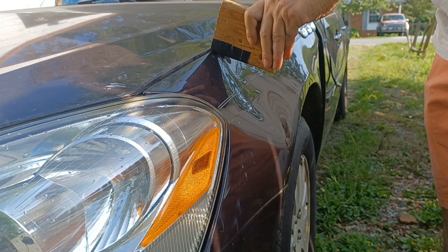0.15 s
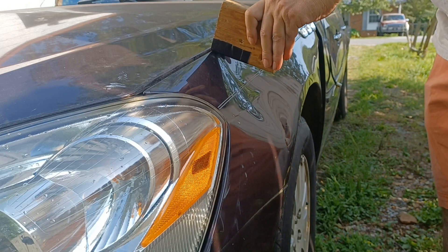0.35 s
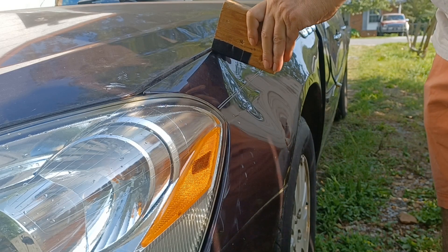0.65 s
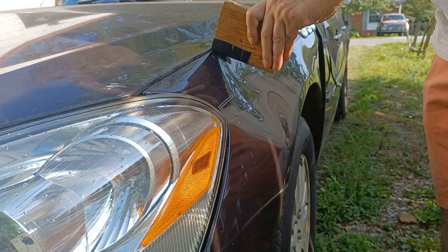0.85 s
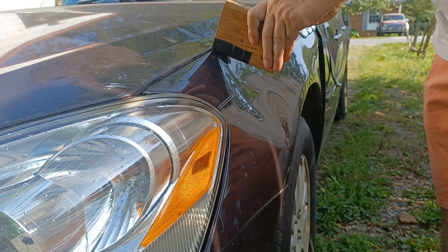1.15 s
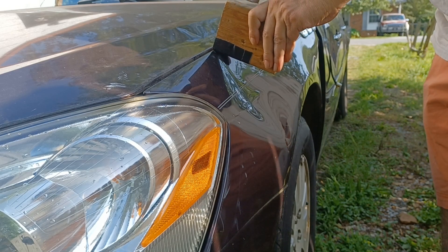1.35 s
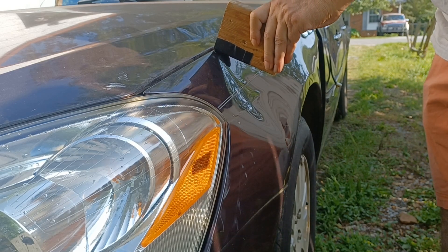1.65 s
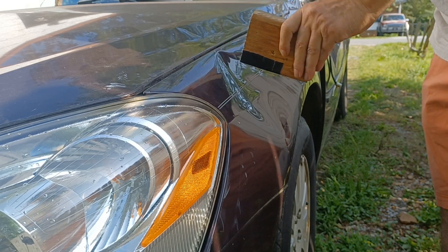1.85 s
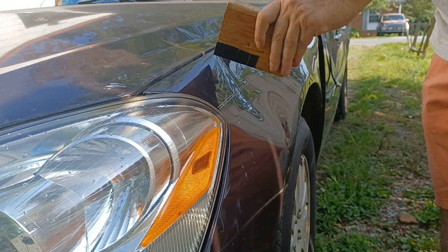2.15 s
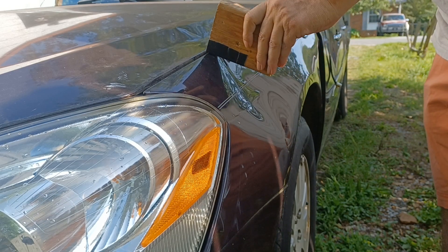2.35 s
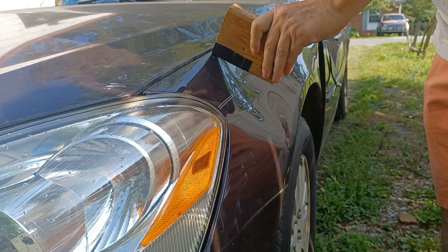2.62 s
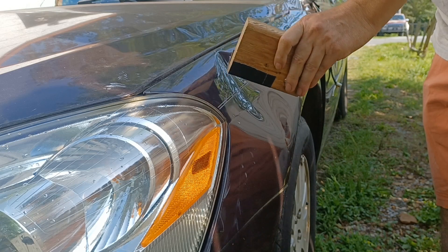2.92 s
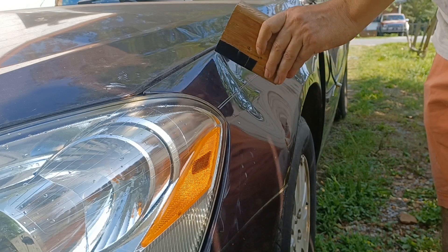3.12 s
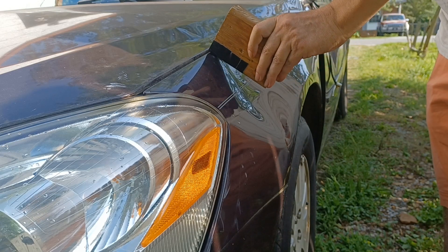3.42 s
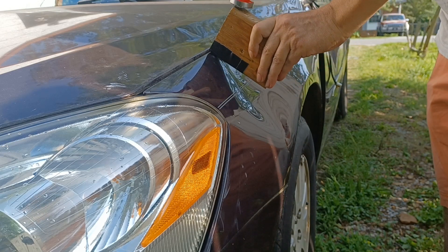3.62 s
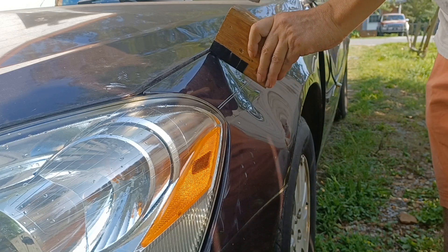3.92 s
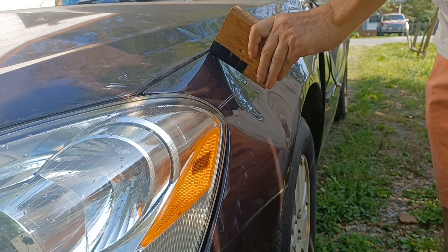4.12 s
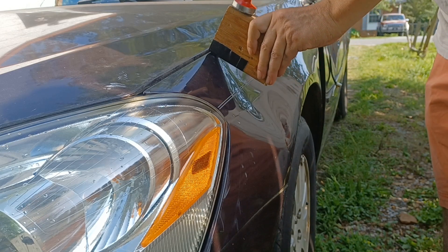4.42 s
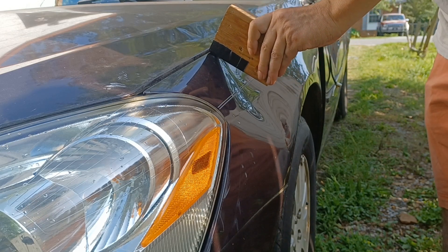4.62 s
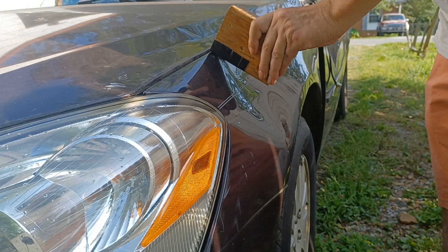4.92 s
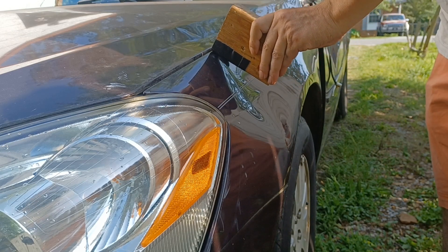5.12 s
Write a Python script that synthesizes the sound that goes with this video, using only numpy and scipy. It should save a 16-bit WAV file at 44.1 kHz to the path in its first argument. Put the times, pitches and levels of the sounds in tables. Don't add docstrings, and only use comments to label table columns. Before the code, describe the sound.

Close, loud knocks of steel on wood, each with a sharp crack, hollow panel thump and short tinny shimmer. A run of seven at under four per second, a quieter gap with three light taps, then a second run of six that sharpens as it goes. Open yard, faint insects, traffic and machine hum; the stereo microphone's left side turns thin late on.

```python
import sys
import numpy as np
from scipy import signal
from scipy.fft import rfft, irfft, next_fast_len
from scipy.io import wavfile
from scipy.ndimage import uniform_filter1d

SR = 44100
rng = np.random.default_rng(int(sys.argv[2]) if len(sys.argv) > 2 else 0)


def store_pcm(level_fs):
    pcm = np.round(np.clip(level_fs, -1, 1) * 32767).astype(np.int16)
    wavfile.write(sys.argv[1], SR, np.atleast_2d(pcm).T)


def amplitude_ratio(level_db):
    exponent = np.asarray(level_db, float) / 20
    return 10 ** exponent


N = 232126

# (time [s], level [dB], contact corner [Hz], crack [dB])
BLOWS = [(0.0526, -0.5, 7000, 1), (0.3643, -1, 5930, 0), (0.6394, -0.5, 7000, 0.5), (0.9261, 0, 7000, 1),
         (1.1955, -0.5, 7000, 1), (1.474, -0.5, 7000, 0.5), (1.7323, 0, 8000, -0.5), (2.5239, -26, 800, -9),
         (3.4137, -17, 615, -12.5), (3.512, -36.5, 493, -20), (3.7188, -4.5, 454, -11),
         (4.0277, -0.5, 1200, -2), (4.306, -1.5, 2040, 0), (4.5761, -0.5, 6000, -1), (4.8414, 0, 7000, -1),
         (5.1035, 0.5, 7000, -1.5)]
BLOCK_MOVES_S = 3.0
RING_N = int(0.4 * SR)
WOOD_SPLIT_HZ = 2600.0
HARD_HZ, FACE_RISE_CYCLES, PRESS_CYCLES = 7000, 4, 0.8
TICK_DB, TICK_S = 5.5, 0.0011


def hammer():
    t = np.arange(RING_N) / SR
    out = np.zeros((2, N + RING_N))
    steel = rng.standard_normal((2, RING_N))
    wood = signal.butter(4, WOOD_SPLIT_HZ, fs=SR, output="sos")
    bright = signal.butter(4, WOOD_SPLIT_HZ, "high", fs=SR, output="sos")
    upper = signal.butter(2, [1400.0, WOOD_SPLIT_HZ], "band", fs=SR, output="sos")
    arrival = np.clip(t / 0.0003 - 2.5, 0, 1)
    tick = amplitude_ratio(TICK_DB) * np.exp(-t / TICK_S)
    head = hammer_head(t)
    for time_s, level_db, contact_hz, crack_db in BLOWS:
        spot = float(time_s > BLOCK_MOVES_S)
        vary = rng.standard_normal((2, len(MODES), 1))
        fresh = rng.standard_normal((2, RING_N))
        dense = shimmer(0.75 * steel + 0.51 * fresh, t,
                        hold_s=0.017, late_db=-26, late_stretch=4.15, rise_s=0.0011)
        body = amplitude_ratio(1.38) * panel(vary, t, spot) + amplitude_ratio(10) * signal.sosfilt(wood, dense)
        face = shimmer(fresh[::-1], t,
                       hold_s=0.021, late_db=-17.5, late_stretch=4.1, rise_s=FACE_RISE_CYCLES / contact_hz)
        press = 1 - np.exp(-t * contact_hz / PRESS_CYCLES)
        soft = signal.butter(2, contact_hz, fs=SR, output="sos")
        thud = signal.sosfilt(soft, arrival * press * body)
        touch = arrival * (1 + tick * contact_hz / HARD_HZ) * face
        rattle = amplitude_ratio(5 + 1.14 * spot) * signal.sosfilt(upper, touch)
        rattle = rattle + (1 - 0.31 * spot) * arrival * head
        blunt = signal.butter(1, min(16 * contact_hz, 0.49 * SR), fs=SR, output="sos")
        crack = signal.sosfilt(blunt, signal.sosfilt(bright, touch))
        blow = thud + amplitude_ratio(crack_db) * rattle + amplitude_ratio(crack_db + 8.0) * crack
        start = int((time_s - 0.003) * SR)
        out[:, start:start + RING_N] += amplitude_ratio(level_db) * blow
    return out[:, :N]


# (frequency [Hz], level [dB], t60 [s])
HEAD = [(1890, -27.5, 0.2), (2013, -29, 0.16)]


def hammer_head(t):
    return sum(amplitude_ratio(db) * np.exp(-np.log(1000) * t / t60_s) * np.sin(2 * np.pi * hz * t)
               for hz, db, t60_s in HEAD)


# (frequency
# [Hz], t60 [s], signed swing left [1], right [1], right after block moves [1])
PANEL = [(118, 0.6, 0.03, 0.03, 0.04), (145, 0.275, -0.21, -0.18, -0.28), (166, 0.098, 0.9, 0.67, 0.88),
         (190, 0.333, 0.11, 0.1, 0.14), (230, 0.117, -0.59, -0.87, -0.95),
         (244, 0.327, -0.21, -0.18, -0.19), (282, 0.196, -0.29, -0.2, -0.19),
         (334, 0.163, -0.2, -0.18, -0.14), (381, 0.116, -0.58, -0.74, -0.87), (436, 0.048, 0.37, 0.62, 0.4),
         (492, 0.104, -0.34, -0.55, -0.51), (562, 0.193, -0.18, -0.15, -0.03),
         (643, 0.069, 0.45, 0.62, 0.36), (700, 0.053, 0.63, 0.61, 0.23),
         (826, 0.1, -0.02, -0.14, -0.11), (863, 0.149, 0.04, 0.07, 0.11), (967, 0.072, 0.33, 0.18, 0.09),
        (1007, 0.056, 0.02, 0.5, 0.85), (1091, 0.076, -0.0, -0.16, -0.15),
        (1144, 0.031, -0.75, -0.37, -0.46), (1274, 0.031, 0.25, 0.43, 0.76),
        (1334, 0.065, 0.09, 0.13, 0.45),
         (1525, 0.042, 0.04, -0.26, -0.41), (1595, 0.104, -0.09, -0.1, -0.11),
         (1686, 0.035, -0.58, -0.22, -0.04), (1825, 0.058, -0.18, -0.18, -0.1),
         (1858, 0.068, 0.0, 0.1, 0.13), (2039, 0.067, 0.08, 0.08, 0.06), (2158, 0.097, -0.01, 0.03, 0.07),
         (2261, 0.04, -0.17, -0.12, -0.06)]
MODES = PANEL


def panel(vary, t, spot):
    hz, t60_s, left, right, moved = np.transpose(MODES)[:, :, None]
    hz = hz * (1 + 0.002 * vary[0])
    swell = 1 - np.exp(-t / (0.016 * (300 / hz) ** 0.6))
    decay = np.exp(-np.log(1000) * t / t60_s)
    ring = amplitude_ratio(0.27 * vary[1]) * swell * decay * np.sin(2 * np.pi * hz * t)
    shift = spot * (moved - right)
    return np.array([np.sum((left + shift) * ring, axis=0), np.sum((right + shift) * ring, axis=0)])


# (frequency [Hz], t60 [s])
SHIMMER_T60 = [(100, 0.73), (300, 0.27), (1000, 0.16), (3000, 0.11), (7000, 0.0838), (15000, 0.093)]
# (frequency [Hz], density [dB per Hz])
SHIMMER_LEFT = [(90, -45), (140, -13), (400, -10), (1000, -12.5), (2300, -19), (2700, -26.5), (6700, -27.5),
                (7800, -43.5), (12000, -36.5), (16000, -36)]
# (frequency [Hz], density [dB per Hz])
SHIMMER_RIGHT = [(90, -47), (140, -12.5), (400, -11), (1000, -16), (2300, -27.5), (2700, -26),
                 (5500, -40.5), (8200, -68), (12000, -45), (16000, -45.5)]
# (frequency [Hz], correlation [1])
SHIMMER_LIKENESS = [(60, .9), (300, .8), (640, .5), (1400, .2), (3000, .1), (7000, 0), (15000, 0)]


def shimmer(noise, t, hold_s, late_db, late_stretch, rise_s):
    out = 0
    rise = 1 - np.exp(-t / rise_s)
    for hz, pair in bands(noise, SHIMMER_LEFT, SHIMMER_RIGHT, SHIMMER_LIKENESS, step=0.97):
        fall = np.log(1000) * np.maximum(t - hold_s, 0) / table(SHIMMER_T60, hz)
        out = out + pair * rise * (np.exp(-fall) + amplitude_ratio(late_db) * np.exp(-fall / late_stretch))
    return out


RUMBLE_DB, RUMBLE_PEAK_S = 10.5, 0.06


def rumble_db(t):
    lift = 0
    for time_s, level_db, _, _ in BLOWS:
        since = np.maximum(t - time_s, 0) / RUMBLE_PEAK_S
        lift = lift + amplitude_ratio(level_db) * since * np.exp(1 - since)
    return RUMBLE_DB * lift


# (frequency [Hz], density [dB per Hz])
YARD_LEFT = [(25, -34.5), (108, -3), (230, -8.5), (450, -18), (1400, -33), (2500, -32.5), (2700, -27),
             (5000, -27), (6100, -22), (7400, -29), (8400, -52), (13000, -47.5), (16000, -57.5)]
# (frequency [Hz], density [dB per Hz])
YARD_RIGHT = [(25, -38.5), (108, -2), (230, -13.5), (450, -18), (1400, -34.5), (2250, -36.5), (2600, -33),
              (4000, -34.5), (4300, -42.5), (5500, -48), (8200, -73), (13000, -57.5), (16000, -62)]
# (frequency [Hz], correlation [1])
YARD_LIKENESS = [(60, 1), (130, 0.93), (290, 0.31), (640, -0.088), (1410, -0.91), (3100, -0.2),
                 (6820, -0.13), (15000, -0.11)]
TRAFFIC_DB, INSECTS_DB = -51.5, -64
RUMBLE_TREBLE_SHARE = 0.16


def yard():
    t = np.arange(N) / SR
    gain_db, lift_db = microphone_gain_db(t), rumble_db(t)
    traffic_db = TRAFFIC_DB + gain_db + lift_db
    insects_db = INSECTS_DB + gain_db + RUMBLE_TREBLE_SHARE * lift_db
    out = 0
    for hz, pair in bands(rng.standard_normal((2, N)), YARD_LEFT, YARD_RIGHT, YARD_LIKENESS, step=0.779):
        high = np.clip(np.log2(hz / 950.0) / 2, 0, 1)
        flicker_db = (2.5 - 1.7 * high) * walk(15) + 0.54 * walk(3)
        level_db = (1 - high) * (traffic_db + 26.5) + high * (insects_db + 41)
        out = out + pair * amplitude_ratio(level_db + flicker_db)
    return out + machines(insects_db)


# (frequency [Hz], level [dB rms])
HUM = [(118.4, -62), (236.9, -58)]
# (frequency [Hz], level [dB rms])
WHINES = [(1594, -85), (2008, -85), (2659, -83), (2772, -84), (4514, -83), (6008, -79), (6374, -80)]
RIGHT_DB_PER_KHZ = -1


def machines(insects_db):
    out = 0
    for hz, db in HUM + WHINES:
        phase = 2 * np.pi * np.cumsum(hz + 1.35 * walk(9.9)) / SR
        level_db = db + 4.0 + 2.4 * walk(18) + 1.1 * (insects_db + 63.0)
        out = out + amplitude_ratio(level_db) * np.sin(phase) * amplitude_ratio([[0], [RIGHT_DB_PER_KHZ * hz / 1000]])
    return out


CREEP_FROM_S, CREEP_DB_PER_S, CREEP_TOP_DB = 2.766, 13, 9
KNOCKED_S, KNOCKED_DB, SAG_DB_PER_S, KNOCK_S = 4.03, 3, 2, 0.03


def microphone_gain_db(t):
    creep = np.clip(CREEP_DB_PER_S * (t - CREEP_FROM_S), 0, CREEP_TOP_DB)
    since = np.maximum(t - KNOCKED_S, 0)
    knocked = KNOCKED_DB - SAG_DB_PER_S * since
    return creep + (knocked - creep) * (1 - np.exp(-since / KNOCK_S))


def table(points, hz):
    f, v = np.transpose(points)
    return np.interp(np.log(hz), np.log(f), v)


def bands(noise, left, right, likeness, step):
    n = next_fast_len(noise.shape[-1])
    hz = np.arange(1, n // 2 + 2) * SR / n
    mid, side = rfft(noise, n)
    like = np.clip(table(likeness, hz), -1, 1)
    pair = np.sqrt((1 + like) / 2) * mid + np.sqrt((1 - like) / 2) * side * np.array([[1], [-1]])
    pair = pair * amplitude_ratio(np.array([table(left, hz), table(right, hz)]))
    for centre in np.arange(np.log2(25), np.log2(17000), step):
        window = np.cos(np.pi / 2 * np.clip((np.log2(hz) - centre) / step, -1, 1)) ** 2
        yield 2 ** centre, irfft(pair * window, n)[:, :noise.shape[-1]]


def walk(rate_hz):
    k = int(SR / rate_hz)
    held = np.repeat(rng.standard_normal(N // k + 1), k)
    return 1.53 * uniform_filter1d(uniform_filter1d(held, k), k)[:N]


def scene():
    return hammer() + yard()


def low_pass(x):
    return signal.sosfilt(signal.butter(12, 16650, fs=SR, output="sos"), x)


PORT_CHANGE_S, TOP_HZ = 4.134, 15950


def record(dry):
    dry = signal.sosfilt(signal.butter(1, 55.0, "high", fs=SR, output="sos"), dry)
    t = np.arange(N) / SR
    left, right = dry
    bass = signal.sosfiltfilt(signal.butter(2, 280.0, fs=SR, output="sos"), left)
    duck_db = -6 * np.exp(-np.maximum(t - PORT_CHANGE_S, 0) / 0.062)
    for time_s, _, _, _ in BLOWS:
        if time_s > PORT_CHANGE_S:
            since = t - time_s + 0.0045
            duck_db -= 36 * (since > 0) * np.exp(-(np.maximum(since, 0) / 0.019) ** 2.34)
    thin = (left - 0.88 * bass) * amplitude_ratio(duck_db)
    changed = np.clip((t - PORT_CHANGE_S) / 0.003, 0, 1)
    ports = np.array([left + changed * (thin - left), right])
    ports = 1.523 * np.tanh(ports / 1.524)
    ports = signal.sosfilt(signal.ellip(10, 0.2, 40, TOP_HZ, fs=SR, output="sos"), ports)
    return low_pass(ports)


dry = scene()
out = record(dry)
store_pcm(out)
```